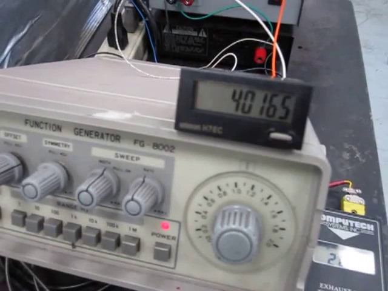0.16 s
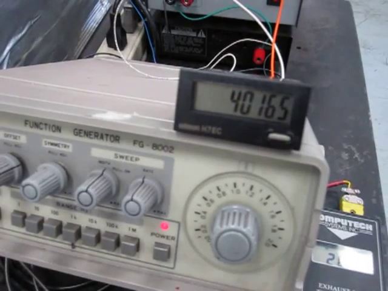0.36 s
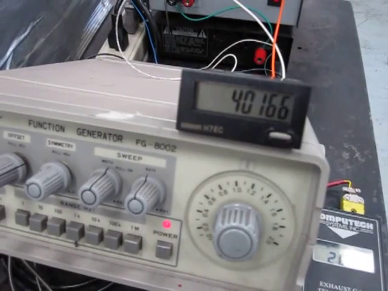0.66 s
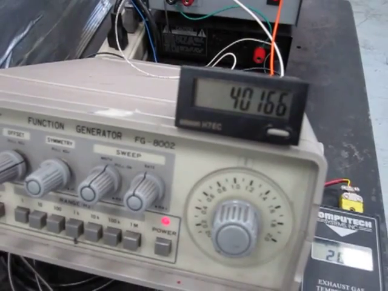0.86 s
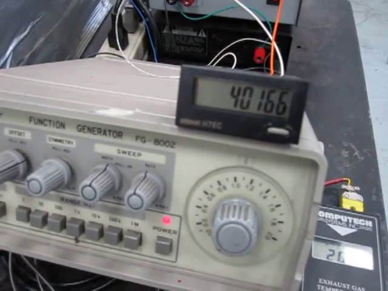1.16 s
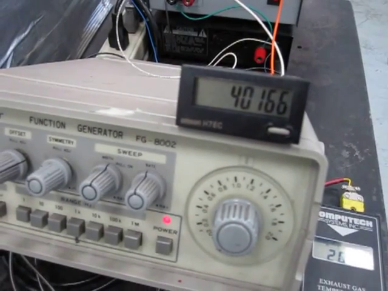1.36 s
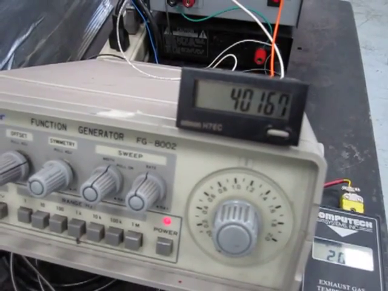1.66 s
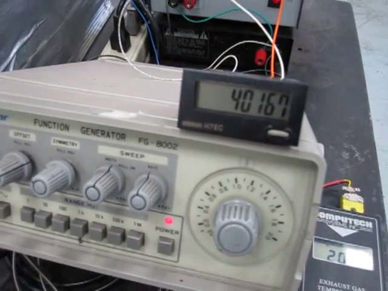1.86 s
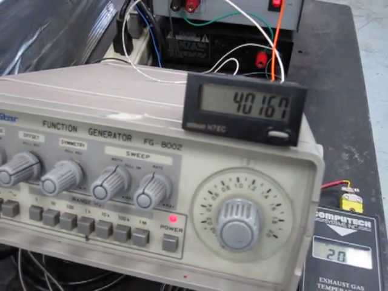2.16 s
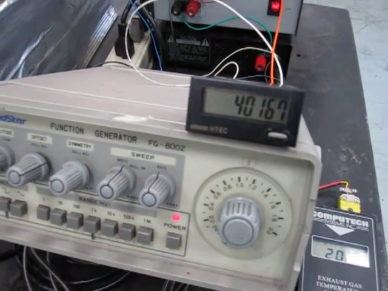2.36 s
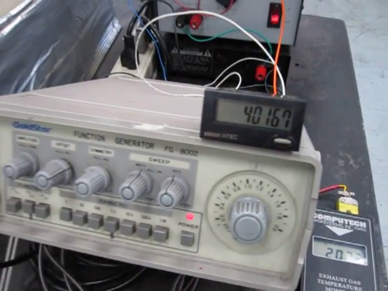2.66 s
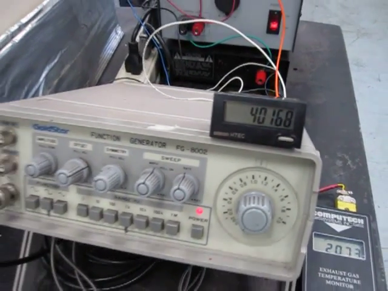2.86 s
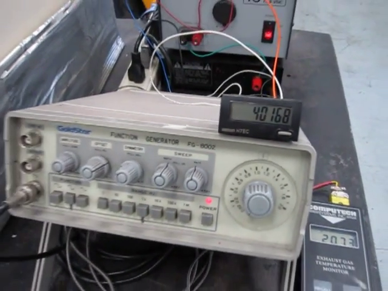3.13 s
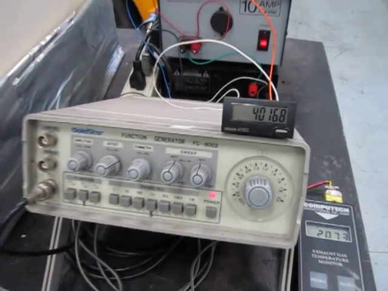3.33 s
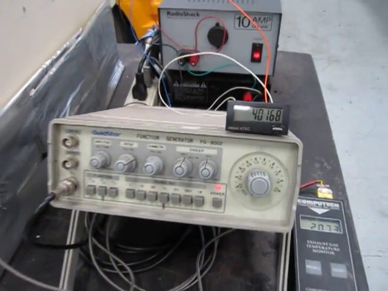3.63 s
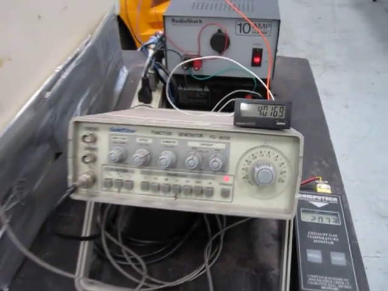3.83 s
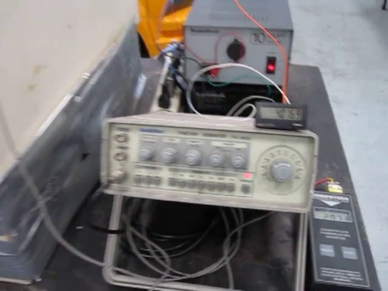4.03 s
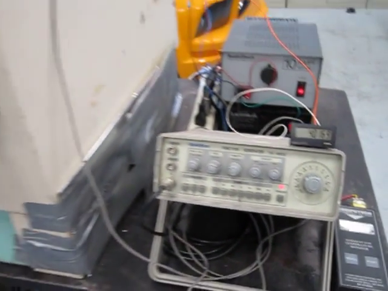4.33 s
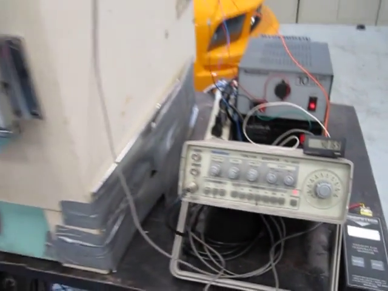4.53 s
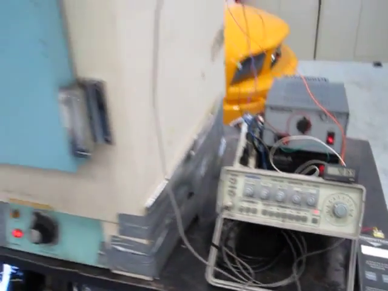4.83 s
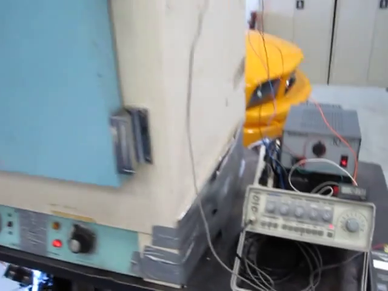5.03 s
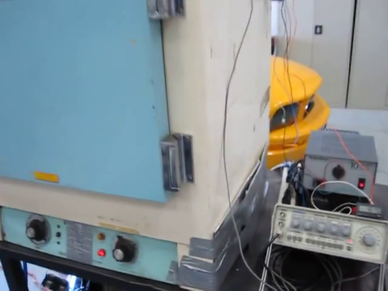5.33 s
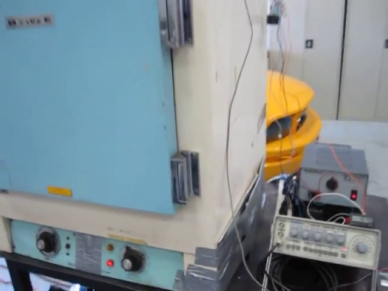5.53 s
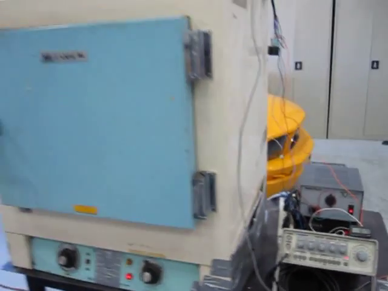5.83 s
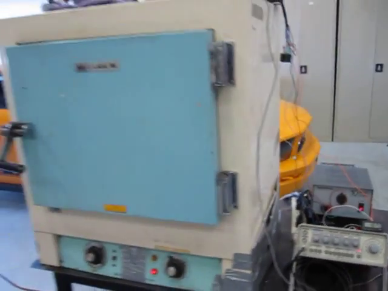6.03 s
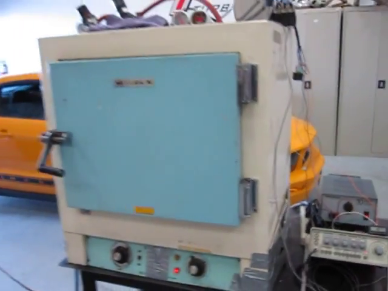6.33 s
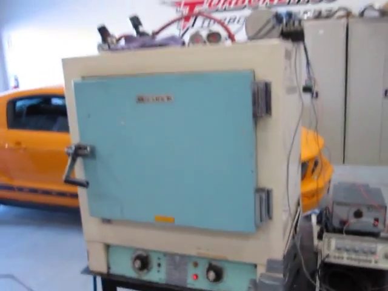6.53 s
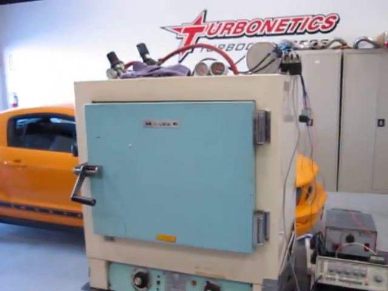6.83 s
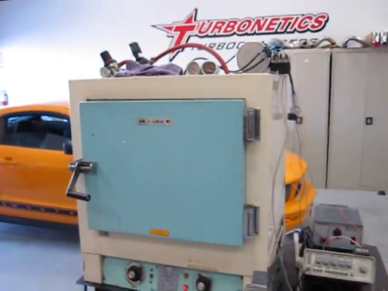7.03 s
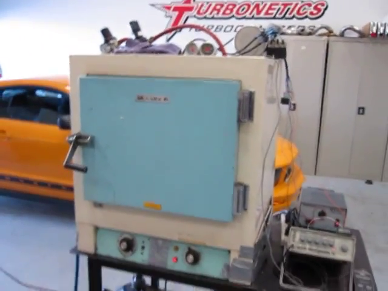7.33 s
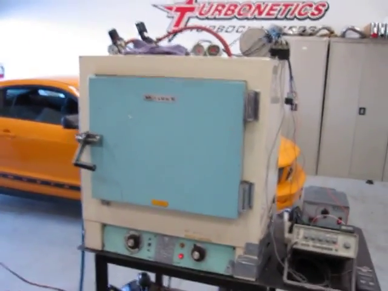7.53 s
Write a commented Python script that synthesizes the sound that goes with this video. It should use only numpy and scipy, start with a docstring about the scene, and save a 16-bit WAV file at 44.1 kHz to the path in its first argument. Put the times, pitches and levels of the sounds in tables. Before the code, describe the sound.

A close handheld microphone hears a workshop bench: steady low-to-mid motor hum with slightly wavering overtones, faint thin whines, broad fan roar and a constant hissing air leak. A tiny tick comes at 0.5 seconds, then a valve fires at about 0.65, 1.74, 2.83, 3.92, 5.01, 6.10 and 7.19. Each blow is very short: a round hollow chuff, a brighter rush and spray with a trace of whistle, and a low thump. The room rings on, while a breathy drain of air with faint pipe singing swells and dies over a few tenths of a second. The background ducks after each blast and eases back. From 2.6 the microphone retreats; hum and roar weaken unevenly and high fizz stands out. Faint airy whistles appear after 4.3, more from 6.5, with soft handling rumble near 6.5 and ticks near 6.07 and 7.16.

```python
"""In a workshop, at the bench: a blow-off valve cycles on a test rig about once a second.
Each blow is pipe-coloured noise (chuff, then rush), a noise spray and a low thump; the room rings on after it.
Around it are a motor hum of shaft-speed multiples, thin tones, a fan's roar and the noise of a steady air leak.
The hand-held camera's microphone backs off to 1.2 m from its first place.
Its gain control ducks everything just after each blow and eases back."""
import sys
import numpy as np
from scipy import signal
from scipy.fft import rfft, irfft
from scipy.io import wavfile

SR = 44100
rng = np.random.default_rng(int(sys.argv[2]) if len(sys.argv) > 2 else 0)


def pcm_store(signal):
    """Save signal as 16-bit PCM."""
    levels = np.round(np.clip(np.atleast_2d(signal), -1, 1) * 32767)
    wavfile.write(sys.argv[1], SR, levels.astype(np.int16).T)


N = 338688
TIME = np.arange(N) / SR  # s
BINS = np.fft.rfftfreq(N, 1 / SR)  # Hz
SHAFT_HZ = 29.32
EDGE_HZ = 17150  # top of the microphone channel

# Microphone's retreat from its first place at the bench: (time [s], distance [m])
RETREAT = [(2.6, 0), (3.5, .2), (4.5, .5), (5.5, .8), (6.5, 1.05), (7.6, 1.2)]
# Strong motor tones, before their standing waves: (multiple of shaft speed, level at the bench [dB],
# fall [dB/m], reflected share [0-1], place of a node [m], node spacing [m])
STRONG_ORDERS = [(4, -26.8, 11.8, .28, .06, 1.41), (8, -32.7, 8.8, .47, .51, .8), (10, -42, 10, .2, .4, .9),
                 (12, -30.6, -.7, .2, .44, 1.51), (16, -38.5, .8, .47, .76, .72),
                 (19, -32, 12.6, .39, .75, .7), (20, -26.8, 13.4, .31, .76, .7),
                 (28, -43, -2.5, .3, .05, .6), (36, -32.4, 4.6, .37, .18, .98)]
# Weak motor tones, relative to a shared level: (multiple of shaft speed, level [dB])
WEAK_ORDERS = [(11, -50.5), (13, -47.5), (14, -48), (15, -50.5), (17, -49), (18, -42.5), (24, -42.5),
               (33, -45), (34, -43), (38, -50.5), (39, -47), (40, -41), (43, -43), (44, -47), (45, -39),
               (46, -45), (53, -47), (56, -50), (67, -44), (71, -42), (130, -47)]
# Other steady tones: (frequency [Hz], level [dB], rms frequency waver [Hz])
STEADY_TONES = [(150, -48.5, 1.2), (6918, -42.5, 6), (10201, -50, 7), (5803, -47.5, 9), (3811, -48, 5)]
# Colour of the fan's roar: (frequency [Hz], relative density [dB])
ROAR_COLOUR = [(35, -28), (60, -13), (105, -15), (200, -10), (420, -7), (580, 0), (700, -.5), (830, -4.5),
               (900, -4.5), (1120, -2), (1310, -1.2), (1500, -8.5), (2100, -11), (3000, -16.5), (6000, -46)]
# Colour of the leak's hiss: (frequency [Hz], relative density [dB])
HISS_COLOUR = [(500, -26.5), (1400, -5.5), (2000, -4.7), (2600, -5), (3250, -.9), (4300, -.7), (5300, -3.5),
               (5800, -.3), (6150, -2.5), (6850, 2), (7700, -2), (8600, -4.5), (10000, -7.5), (14000, -30)]
# Colour of the leak's high fizz: (frequency [Hz], relative density [dB])
FIZZ_COLOUR = [(7000, -34), (9300, -10.5), (10700, -1.5), (11300, -1), (11900, 0.5), (12700, -1.5),
               (13800, -9), (15000, -11), (16300, -18.5), (17200, -27.5)]
# Colour of the handling rumble: (frequency [Hz], relative density [dB])
RUMBLE_COLOUR = [(30, -22), (52, 0), (66, 0), (95, -11), (200, -12), (350, -24), (600, -70)]
# Faint sharp ticks from the rig: (time [s], level before the decay [dB])
TICKS = [(0.531, -21), (6.0735, -15), (7.1645, -19)]
# Valve cycles: (time [s], chuff level [dB], rush level [dB], rush delay [s], rush top edge [Hz],
# whistle frequency [Hz], whistle level [dB], drain level [dB])
BLOWS = [(0.6520, -11.3, -13, .014, 2800, 4500, -17.5, -17.3),
         (1.7420, -8.8, -10, .015, 2200, 7400, -19.5, -16),
         (2.8330, -10.5, -11, .014, 2750, 4750, -16.5, -17.3),
         (3.9245, -13, -12, .008, 3100, 7400, -24, -19), (5.0105, -14, -9.8, .010, 3200, 4300, -24, -21.3),
         (6.1015, -10.7, -9.5, .010, 2550, 3300, -22, -19.8),
         (7.1935, -13, -13.8, .011, 2750, 5400, -25, -22)]
# Resonances of valve body and pipe, relative within each part: (frequency [Hz], width [Hz],
# level as it cracks open [dB], level when wide open [dB])
PIPE_RESONANCES = [(1120, 110, -12.5, -18), (1375, 85, 0, -5), (1710, 170, 1.5, 3), (2040, 200, -10, -4),
                   (2330, 200, -17, -3), (2660, 200, -14, -.5)]
# Colour of the outlet jet: (frequency [Hz], relative density [dB])
SPRAY_COLOUR = [(600, -26.5), (1300, 0), (2900, -6), (3600, -1), (4700, 1.5), (6300, -3), (7400, 1.5),
                (8400, -4), (12000, -5.5), (16500, -15)]
# Workshop decay: (frequency [Hz], time to fall 60 dB [s])
ROOM_T60 = [(100, 0.54), (1400, 1.25), (2500, 1.05), (4500, .95), (8000, .85), (15000, .5)]
# Workshop tail colour: (frequency [Hz], relative level [dB])
ROOM_COLOUR = [(60, -3), (1400, -.5), (2300, -1.5), (2850, -1.5), (3600, 3.5), (4800, 2.5), (7500, 2.5),
               (14000, -3)]
# Colour of the air draining after a blow: (frequency [Hz], relative density [dB])
DRAIN_COLOUR = [(700, -30), (1200, -7), (1370, 1), (1520, -3), (1750, 0), (2100, -2.5), (2500, -4),
                (2900, -7.5), (3500, -3.5), (4600, -6), (6000, -15), (7400, -12), (14000, -30)]
# Pipe resonances that sing during the drain: (frequency [Hz], width [Hz], level against the drain [dB])
SINGING = [(1370, 22, -9), (1735, 40, -8), (2340, 90, -15), (3650, 130, -15)]
# Airy whistles in the leak: (start of hold [s], hold [s], frequency [Hz], width [Hz], held level [dB])
LEAK_WHISTLES = [(4.3, .6, 9430, 110, -37), (5.2, .35, 7050, 400, -33), (6.5, .4, 12600, 220, -32),
                 (6.75, .65, 11850, 220, -32), (6.85, .8, 10850, 160, -37)]


def amp(db):
    """Decibels to gain."""
    return np.exp(np.asarray(db) * np.log(10) / 20)


def unit(x):
    """Scales to rms 1."""
    return x / np.sqrt(np.mean(x ** 2) + 1e-20)


def read(points, hz):
    """Reads a spectrum on a log-frequency axis."""
    f, value = np.transpose(points)
    return np.interp(np.log(hz + 1), np.log(f + 1), value)


def add(mix, s, sound):
    """Mixes a sound in at time s."""
    part = mix[max(round(s * SR), 0):][:len(sound)]
    part += sound[:len(part)]


def noise(colour):
    """Steady noise of a given colour, at rms 1."""
    spectrum = rfft(rng.standard_normal(N)) * amp(read(colour, BINS))
    return unit(irfft(spectrum, N))


def drift(hz):
    """Slow chance at rms 1, up to about hz changes a second, drawn on a coarse time grid."""
    grid = TIME[::256]
    f = np.fft.rfftfreq(len(grid), grid[1])
    spectrum = rfft(rng.standard_normal(len(grid))) / (1 + (f / hz) ** 4)
    return np.interp(TIME, grid, unit(irfft(spectrum, len(grid))))


def resonate(x, hz, width):
    """A two-pole resonance that keeps about the same power whatever its width in Hz."""
    r = np.exp(-np.pi * width / SR)
    poles = [1, -2 * r * np.cos(2 * np.pi * hz / SR), r * r]
    return np.sqrt(1 - r) * signal.lfilter([1, 0, -1], poles, x)


def band(x, hz, kind, order):
    """A Butterworth low-pass or high-pass."""
    sections = signal.butter(order, min(hz, SR / 2 - 1), kind, fs=SR, output="sos")
    return signal.sosfilt(sections, x)


def gate(t, start, length, rise, fall):
    """Flow that swells up to start, holds for a length and dies away exponentially."""
    before = np.minimum(t - start, 0)
    after = np.maximum(t - start - length, 0)
    return np.exp(before / rise - after / fall)


def retreat():
    """The microphone's distance from its first place at the bench, in metres."""
    return np.interp(TIME, *np.transpose(RETREAT))


def standing_wave(metres, reflected, node, spacing):
    """Gain of a tone that meets its own reflection: weakest at each node."""
    phase = 2 * np.pi * (metres - node) / spacing
    return np.sqrt(abs(1 + reflected ** 2 - 2 * reflected * np.cos(phase)))


def shaft_tone(order):
    """One multiple of the steady shaft speed, at rms 1."""
    turns = order * SHAFT_HZ * TIME + rng.random()
    return np.sqrt(2) * np.cos((2 * np.pi * turns).astype(np.float32))


def motor(waver=.12, weak_waver=.45, weak_db=-.7, weak_fall_db_per_m=3.2):
    """Shaft multiples: the microphone crosses the strong ones' standing waves; the weak ones waver and fade."""
    metres = retreat()
    strong = np.zeros(N)
    for order, db, fall, *wave in STRONG_ORDERS:
        gain = amp(db - fall * metres) * standing_wave(metres, *wave)
        strong += gain * (1 + waver * drift(7)) * shaft_tone(round(order))
    weak = np.zeros(N)
    for order, db in WEAK_ORDERS:
        weak += amp(db) * (1 + weak_waver * drift(1.5)) * shaft_tone(round(order))
    return strong + amp(weak_db - weak_fall_db_per_m * metres) * weak


def tones(flicker=.45):
    """A faint low drone and thin whistles: sines that waver in pitch and level."""
    out = np.zeros(N)
    for hz, db, waver in STEADY_TONES:
        phase = 2 * np.pi * np.cumsum(hz + waver * drift(25)) / SR
        out += amp(db) * (1 + flicker * drift(5)) * np.sin(phase)
    return np.sqrt(2) * out


def bench(x, echo=.21, longest=.009, sway=.00005, count=7):
    """Short echoes (s) off hard surfaces near the microphone comb the leak; the comb shifts as it moves."""
    out = x.copy()
    for delay in rng.uniform(.0012, longest, count):
        out += echo * np.interp(TIME - delay - sway * drift(.5), TIME, x, left=0)
    return unit(out)


def air(swell_db=.5, flicker_db=.45):
    """Fan roar and leaking air as coloured noise: with distance the fan fades and the fizz comes clear."""
    metres = retreat()
    roar = amp(-23.5 - 6.2 * metres + swell_db * drift(9)) * noise(ROAR_COLOUR)
    hiss = amp(-23.1 - .6 * metres) * noise(HISS_COLOUR)
    fizz = amp(-25.6 + 1.9 * metres) * noise(FIZZ_COLOUR)
    leak = hiss + fizz
    return roar + np.std(leak) * bench(leak) * amp(flicker_db * drift(12))


def rumble(steady_db=-55, jostle_s=6.55, jostle_db=-47.5, swell_s=.25):
    """The camera in the hand: soft low noise that swells when it is jostled once."""
    jostle = amp(jostle_db) * np.exp(-((TIME - jostle_s) / swell_s) ** 2)
    return (amp(steady_db) + jostle) * noise(RUMBLE_COLOUR)


def ticks(decay=.002, low_hz=6500):
    """Small bright ticks: high-passed noise that dies within milliseconds."""
    t = np.arange(SR // 50) / SR
    out = np.zeros(N)
    for s, db in TICKS:
        bright = unit(band(rng.standard_normal(len(t)), low_hz, "highpass", order=2))
        add(out, s, amp(db) * bright * np.exp(-t / decay))
    return out


def pipe_sound(flow, levels_db):
    """Air noise excites the resonances of the valve body and its pipe."""
    out = np.zeros(len(flow))
    for (hz, width, *_), db in zip(PIPE_RESONANCES, levels_db):
        out += amp(db) * unit(resonate(flow, hz, width))
    return out


def valve(flutter_hz=230, flutter=.4, chuff_s=.012, rush_s=.026, low_hz=1100, spray_db=-13.3):
    """The piston flutters as it cracks open and sounds the pipe; then air rushes, whistles and thumps."""
    lead = .02  # s of swell before each cycle's time
    thump_delay, thump_width = .0185, .0052  # s
    t = np.arange(SR // 5) / SR - lead
    _, _, cracked_db, open_db = np.transpose(PIPE_RESONANCES)
    out, jet, metres = np.zeros(N), noise(SPRAY_COLOUR), retreat()
    for s, chuff_db, rush_db, rush_delay, top_hz, whistle_hz, whistle_db, _ in BLOWS:
        first, second = rng.standard_normal((2, len(t)))
        fluttering = 1 + flutter * np.cos(2 * np.pi * flutter_hz * t)
        puffs = first * gate(t, 0, chuff_s * .8, .004, .002) * fluttering
        flow = second * gate(t, rush_delay, rush_s * .7, .004, .011)
        # the narrow first gap sounds round and hollow; the wide one is brighter
        chuff = band(pipe_sound(puffs, cracked_db), .68 * top_hz, "lowpass", order=4)
        rush = band(pipe_sound(flow, open_db), top_hz, "lowpass", order=6)
        chuff = amp(chuff_db) * unit(chuff)
        rush = amp(rush_db) * unit(rush)
        whistle = amp(whistle_db) * unit(resonate(flow, whistle_hz, 45))
        # levels are set as rms over each part's nominal length, ahead of the high-pass
        pipe = chuff * np.sqrt(chuff_s) + (rush + whistle) * np.sqrt(rush_s)
        pipe = band(pipe * np.sqrt(SR / len(t)), low_hz, "highpass", order=4)
        at = round(s * SR)
        spray = amp(spray_db) * jet[at:][:len(t)] * gate(t, .016, .012, .0035, .006)
        u = (t - thump_delay) / thump_width
        thump = amp(-19 - 6.5 * metres[at]) * (2 * u ** 2 - 1) * np.exp(-u ** 2)
        add(out, s - lead, pipe + spray + thump)
    return out


def workshop(x, build=.014):
    """Dense reflections build up over build seconds and die band by band; they change as the microphone moves."""
    t = np.arange(SR) / SR
    out = np.zeros(N)
    # three chance tails take turns, cross-faded slowly
    for turn in np.arange(3) / 3:
        hz, when, z = signal.stft(rng.standard_normal(SR), SR, nperseg=256)
        t60 = read(ROOM_T60, hz)[:, None]
        decay_db = read(ROOM_COLOUR, hz)[:, None] - 60 * when / t60
        even_energy = np.sqrt(2 * np.log(1000) / t60 / SR)  # whatever the decay time
        z *= amp(decay_db) * even_energy
        tail = signal.istft(z, SR, nperseg=256)[1][:SR]
        tail = tail * (1 - np.exp(-(t / build) ** 2))
        share = np.sqrt(2 / 3) * np.cos(np.pi * (TIME / 4.4 + turn))
        out += signal.fftconvolve(x * share, tail)[:N]
    return out


def drain():
    """The line empties through the open valve: a breathy hiss swells and dies while the pipe sings."""
    flow, singing, pipe = np.zeros(N), np.zeros(N), np.zeros(N)
    for s, *_, db in BLOWS:
        flow += amp(db) * gate(TIME, s + .07, .03, .025, .135)
        singing += amp(db) * gate(TIME, s + .025, .1, .025, .11)
    for hz, width, db in SINGING:
        pipe += amp(db) * unit(resonate(rng.standard_normal(N), hz, width))
    return flow * noise(DRAIN_COLOUR) + singing * pipe


def leak_whistles(fade=.07):
    """Narrow bands of noise in the leak swell, hold and fade."""
    out = np.zeros(N)
    for s, length, hz, width, db in LEAK_WHISTLES:
        whistle = unit(resonate(rng.standard_normal(N), hz, width))
        out += amp(db) * gate(TIME, s, length, fade, fade) * whistle
    return out


def scene():
    """The valve and its echo over the steady machinery, as one channel."""
    steady = motor() + tones() + air() + rumble()
    blows = ticks() + valve()
    echo = amp(-.3) * workshop(blows)
    return (steady + blows + echo + drain() + leak_whistles())[None]


def smooth(x, seconds):
    """One-pole smoothing that starts settled."""
    r = np.exp(-1 / (seconds * SR))
    start = x[:SR // 20].mean()
    return signal.lfilter([1 - r], [1, -r], x - start) + start


def record(dry, threshold_db=-16.1, slope=1.26, sense=.006, attack=.012, recover=.075, ceiling=.85):
    """Gain control (times in s) clamps down after each blow and eases back; peaks round off; a low-pass follows."""
    level_db = 10 * np.log10(abs(smooth(dry[0] ** 2, sense)) + 1e-12)
    excess_db = np.maximum(level_db - threshold_db, 1e-6)
    # each new peak of excess is held and dies away exponentially
    peak_log = np.maximum.accumulate(np.log(excess_db) + TIME / recover)
    held_db = np.exp(peak_log - TIME / recover)
    ducked = dry * amp(-slope * smooth(held_db, attack))
    rounded = ducked / (1 + abs(ducked / ceiling) ** 6) ** (1 / 6)
    low_pass = signal.firwin(511, EDGE_HZ, window=("kaiser", 9), fs=SR)
    return signal.oaconvolve(rounded, low_pass[None], "same")


dry = scene()
out = record(dry)
pcm_store(out)
```